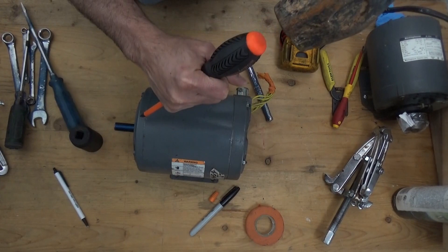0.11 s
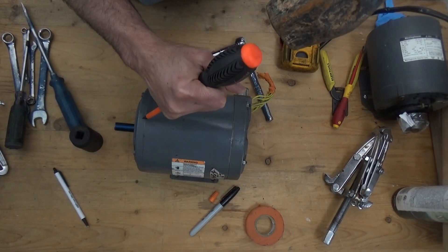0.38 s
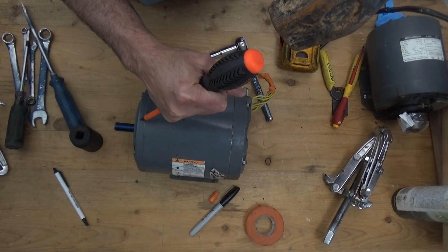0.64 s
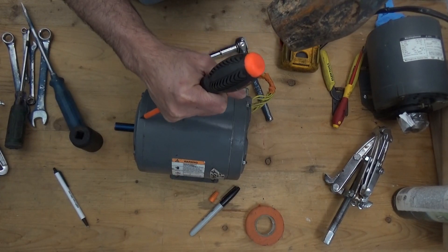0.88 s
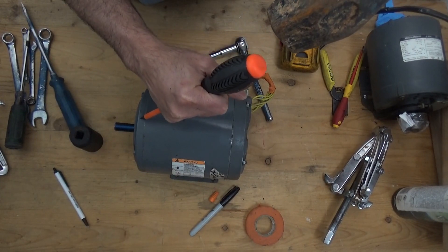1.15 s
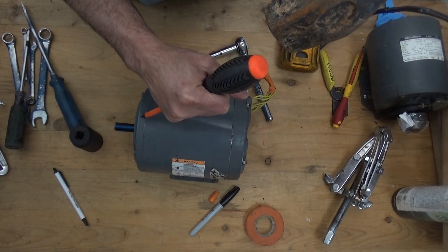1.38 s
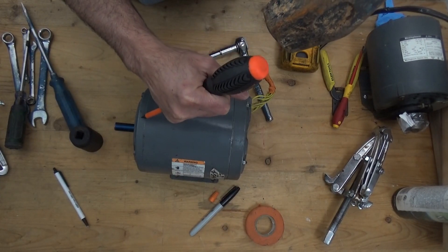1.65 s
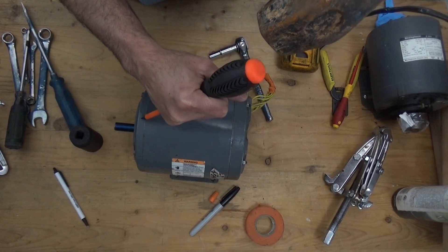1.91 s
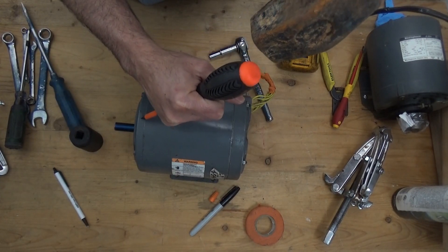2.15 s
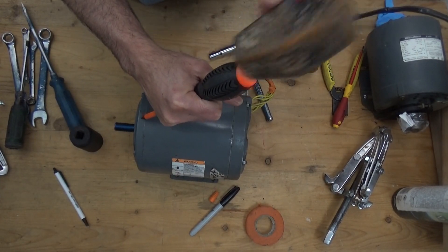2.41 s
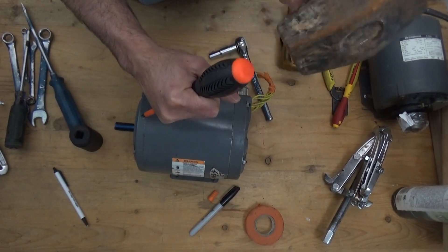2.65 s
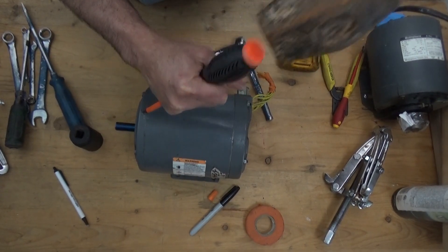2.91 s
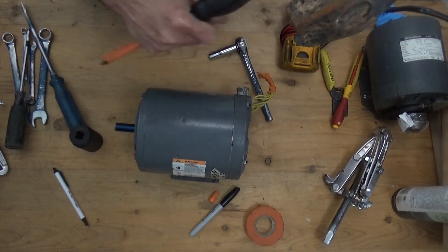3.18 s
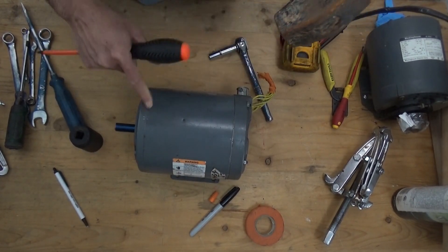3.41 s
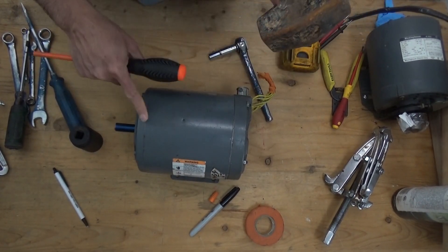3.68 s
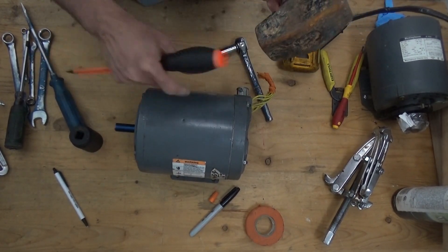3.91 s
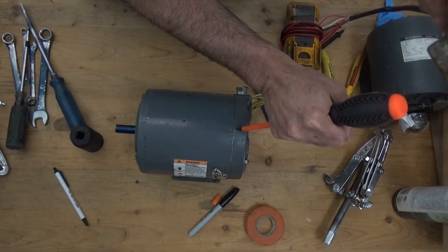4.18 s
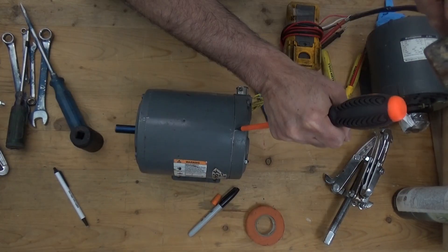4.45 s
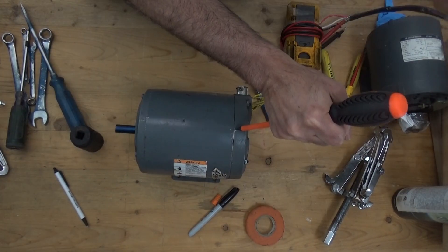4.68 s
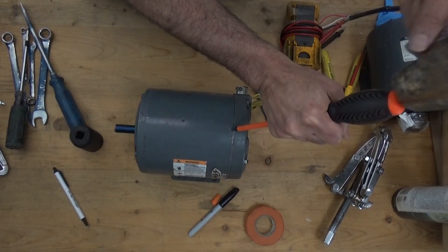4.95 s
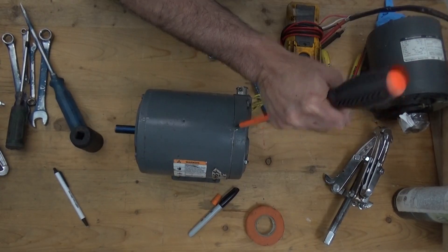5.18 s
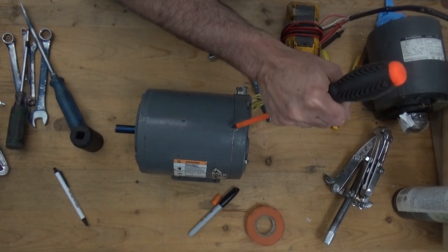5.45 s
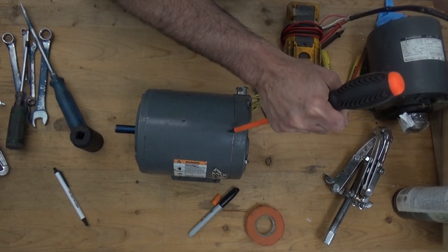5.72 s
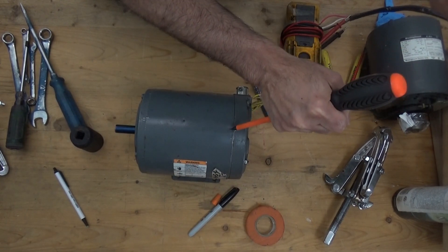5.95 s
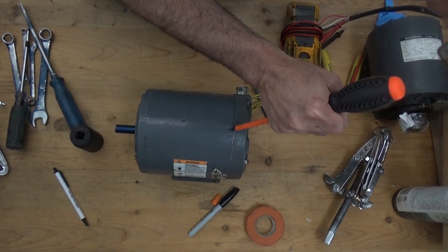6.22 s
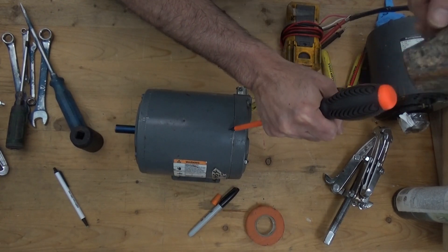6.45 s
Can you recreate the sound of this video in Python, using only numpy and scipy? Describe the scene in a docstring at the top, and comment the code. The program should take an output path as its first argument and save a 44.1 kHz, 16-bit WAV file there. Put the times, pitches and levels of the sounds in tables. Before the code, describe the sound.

A close, nearly centred workshop sound with short room echo, faint hiss, low mains hum and barely audible regular ticking. At 0 s a motor is already jolting under a blow: dull knock, then a stronger clank at 0.1 and smaller bounces until 0.36, with thin spanner ringing. Dry punch-tip ticks come at 0.5, then a cluster with short gritty scrapes at 0.75-0.96 and another at 1.2. Near silence follows. At 2.47 and 2.79 two very loud steel cracks land with wooden boom, dense clang, rattling and uneven rebounds, fading by about 3.2. Soft rocking thumps continue to 3.65, with faint airy finger strokes at 3.6 and 3.75. A small tap sounds at 4.25. At 4.95 one hard, bright double-edged crack clangs with less boom, decaying within half a second. Soft knocks at 5.28 and 5.45, then tiny ticks at 5.8-6.1, and quiet hum to 6.5.

```python
"""Hard steel cracks with a boom and a clang: a sledge hammer drives a punch against the end bell of a
small electric motor on a wooden bench. The motor jumps, lands and rocks; loose spanners ring.
Between blows the punch tip taps and scrapes the housing, and the workshop hums faintly.
Contacts are noise bursts driving resonant modes; the clang and hisses are shaped noise, spanners are
decaying sines, and scattered grains make rattle and friction. Room echoes and a limiter finish it."""
import sys
import numpy as np
from scipy import signal
from scipy.fft import rfft, irfft
from scipy.io import wavfile
from scipy.ndimage import uniform_filter1d

SR = 44100
rng = np.random.default_rng(int(sys.argv[2]) if len(sys.argv) > 2 else 0)


def to_wav(s):
    """Save 16-bit WAV."""
    ch = np.atleast_2d(s).T  # columns
    pcm = np.round(np.clip(ch, -1, 1) * 32767)  # PCM
    wavfile.write(sys.argv[1], SR, pcm.astype(np.int16))


def decibels_to_gain(level_db):
    """Convert a level in decibels to a linear amplitude gain (20 dB per decade)."""
    exponent = np.asarray(level_db, float) / 20
    return 10 ** exponent


N = 290619

# Levels in the tables are relative: each function trims its own layers.
# blows and landings of the motor: t/s, crack/dB, knock/dB, boom/dB, brightness/(dB per octave)
BLOWS = [(0.0014, -27.5, -26.5, -24, -5), (0.0424, -31.5, -27.5, -30.5, -1), (0.1035, -10, -21, -14.5, 3.5),
         (0.1773, -13, -21.5, -21.5, 1), (0.2189, -44, -61, -28.5, -1), (0.2703, -21, -36.5, -29, -3.5),
         (0.299, -24, -73, -65, -4), (0.3557, -35, -74, -74, -11.5), (2.4745, -1.5, -13.5, -9, -1.5),
         (2.513, -18, -28.5, -21, -1), (2.5506, -22, -14.5, -13, -3), (2.575, -23, -51.5, -39, 2.5),
         (2.6043, -33, -28.5, -17, 2.5), (2.647, -38.5, -52, -32.5, -2), (2.7911, -0.5, -10.5, -7.5, -2.5),
         (2.8162, -26.5, -15.5, -20.5, 11), (2.8346, -18, -30.5, -23, 0.6), (2.8894, -22, -15, -14, -0.5),
         (2.9177, -16, -22, -33, 9), (2.9432, -38.5, -31.5, -19.5, -9.5), (2.969, -28, -40, -33, -6),
         (3.0474, -61, -72, -37.5, 3), (3.1708, -45.5, -55, -39, -12), (3.1896, -42.5, -52, -33, 20),
         (4.95, 4, -13, -25, 2), (4.9674, 3, -14, -24, 0)]
# stereo width of the blows: f/Hz, side less mid/dB
BLOW_SIDE = [(60, -15), (110, -19), (200, -24.5), (380, -8), (700, -12), (1290, -4.5), (2380, -12.5),
             (4400, -12.5), (8120, -11), (15000, -22)]
# resonant modes of the wooden bench: f/Hz, level/dB, t60/s
BENCH = [(125, -15, 0.04), (157.5, 0.5, .09), (210, -3, 0.1), (247, 1, 0.077), (276, -1.5, 0.083),
         (338.5, 2, 0.092), (382, -3.5, 0.051)]
# resonant modes of the motor frame: f/Hz, level/dB, t60/s (shortened for rubs)
FRAME = [(459, -1, 0.071), (544.5, -4, 0.11), (612, -0.5, 0.12), (682, -6, 0.13), (736.4, 5, 0.03),
         (787, 5, 0.05), (850, -4, 0.065), (924, 2.5, 0.033), (1048, -2, 0.044), (1126, -14, 0.0071),
         (1286, -2, 0.011), (1397, -13, 0.14), (1694, -10, 0.028), (2143, -12, 0.039)]
# resonant modes of the housing: f/Hz, level/dB, t60/s (shortened for the rattle)
HOUSING = [(1890, 1.5, 0.0073), (2550, -5, 0.021), (3520, 1.5, 0.0031), (3810, 4.5, 0.0084),
           (4280, 1.65, 0.006), (4850, -1, 0.0047), (5880, 3, 0.0038), (7040, -10, 0.0031),
           (7900, -3.5, 0.0048), (8100, -7, 0.0043), (9230, -10, 0.0077), (13000, -23.5, .004)]
# resonant modes of the motor shell: f/Hz, level/dB, t60/s
SHELL = [(2100, -7, .05), (2250, -11, .04), (2549, -5, .06), (2606, -9, .05), (2700, -12, .04)]


def rms_one(x):
    """Scale to unit power."""
    return x / np.sqrt(np.mean(x ** 2) + 1e-30)


def at_hz(points, hz):
    """Read a table on a log-frequency axis."""
    table_hz, values = np.array(points)[:, 0], np.array(points)[:, 1]
    return np.interp(np.log(hz), np.log(table_hz), values)


def filtered(x, order, hz, kind="low"):
    """Butterworth filter with its edge or edges at hz."""
    return signal.sosfilt(signal.butter(order, hz, kind, fs=SR, output="sos"), x)


def shaped(x, points):
    """Give a signal the spectral tilt of a table of f/Hz and dB."""
    hz = np.maximum(np.arange(N // 2 + 1) * SR / N, 1)
    return irfft(rfft(x) * decibels_to_gain(at_hz(points, hz)), N)


def ring(force, hz, t60):
    """A damped resonator: a unit click sets a sine of height 1 ringing."""
    r, w = decibels_to_gain(-60 / (t60 * SR)), 2 * np.pi * hz / SR
    return signal.lfilter([0, np.sin(w)], [1, -2 * r * np.cos(w), r * r], force + 1e-18)


def clicks(seconds, gains):
    """An impulse for each event."""
    out = np.zeros(N)
    np.add.at(out, (np.clip(seconds, 0, 6.5) * SR).astype(int), gains)
    return out


def swell(x, rise_s, fall_s):
    """Each impulse rises and dies away; area one."""
    a, b = np.exp(-1 / (max(rise_s, 1e-5) * SR)), np.exp(-1 / (max(fall_s, 1e-5) * SR))
    risen = signal.lfilter([1 - a], [1, -a], x + 1e-30)
    return signal.lfilter([1 - b], [1, -b], risen)


def gestures(table, column, rise_db_per_s, fall_db_per_s):
    """Each row (start, hold, ..) rises to its level, holds it and falls, at steady dB per second."""
    rows, t = np.array(table)[:, :, None], np.arange(N) / SR
    early = np.maximum(rows[:, 0] - t, 0)
    late = np.maximum(t - rows[:, 0] - np.abs(rows[:, 1]), 0)
    below_db = np.minimum(rise_db_per_s * early + fall_db_per_s * late, 200)
    return decibels_to_gain(rows[:, column] - below_db).sum(0)


def bands(low_hz):
    """Half-octave band-passes with their centres."""
    edges = low_hz * 2 ** np.arange(0, np.log2(17000 / low_hz), .5)
    return [(np.sqrt(a * b), signal.butter(2, [a, b], "band", fs=SR, output="sos"))
            for a, b in zip(edges, edges[1:])]


def strike(table, column, modes, rise_s, hold_s, fall_s, spread_db, trim_db, bright=None):
    """A rough, chattering contact drives every mode while it lasts, with new strengths per event; stereo."""
    rows, out, hold = np.array(table), 0, max(int(hold_s * SR), 1)
    luck = rng.normal(0, 1, (len(rows), len(modes)))
    chatter = rng.standard_normal((2, 2, N))   # two mid/side pairs, taken in turn by the modes
    for k, (hz, level_db, t60) in enumerate(modes):
        tilt_db = rows[:, bright] * np.log2(hz / 4000) if bright else 0
        event_db = rows[:, column] + level_db + tilt_db + trim_db + spread_db * luck[:, k]
        power = clicks(rows[:, 0], decibels_to_gain(event_db) ** 2)
        power = np.abs(uniform_filter1d(power, hold, origin=(hold - 1) // 2, mode="constant"))
        force = np.sqrt(swell(power, rise_s, fall_s)) * chatter[k % 2]
        mid, side = ring(force, hz, t60)
        out = out + mid + decibels_to_gain(at_hz(BLOW_SIDE, hz)) * side * [[1], [-1]]
    return out


def chime(start_s, level_db, modes, rise_s, lasts_s, tilt_db):
    """Clean modes swell and decay, and are damped faster once lasts_s has passed."""
    t = np.arange(SR // 2) / SR
    shape = (1 - np.exp(-t / rise_s)) * np.exp(-np.maximum(t - lasts_s, 0) / 0.026)
    tone = 0
    for hz, db, t60 in modes:
        mode_db = level_db + db + tilt_db * np.log2(hz / 7000) - 60 * t / t60
        tone = tone + decibels_to_gain(mode_db) * np.sin(2 * np.pi * (hz * t + rng.random()))
    out, at = np.zeros(N + len(t)), int(max(start_s, 0) * SR)
    out[at:at + len(t)] = shape * tone
    return out[:N]


def workshop():
    """Air and microphone hiss, mains hum, a thin whine, a faint regular ticking, and the shaking stand."""
    # air spectrum: f/Hz, level/dB
    air_points = [(15, -39), (25, -13.5), (64, -0.5), (87, -18.5), (108, -3.5), (145, -7.5), (242, -5),
                  (451, -11.5), (503, -12), (1370, -14), (1700, -16.5), (2610, -18), (16000, -27)]
    # stereo width of the air: f/Hz, side less mid/dB
    air_side = [(60, -25), (110, -17), (200, -8), (380, -4), (700, -1), (1290, 1), (2380, -2), (4400, -6),
                (8120, -8.5), (15000, -10)]
    # hum and whine: f/Hz, rms level/dB
    hum_lines = [(59.8, -74), (120, -75.5), (7900, -82)]
    # the microphone stand is set shaking with the bench: t/s, hold/s, level/dB
    shakes = [(0.0, .25, -66), (0.84, .04, -53), (2.478, .1, -45), (2.796, .14, -46), (3.2, .03, -57),
              (4.955, .03, -56)]
    t = np.arange(N) / SR
    mid = shaped(rng.standard_normal(N), air_points)
    side = shaped(shaped(rng.standard_normal(N), air_points), air_side)
    air = decibels_to_gain(-63) * (mid + side * [[1], [-1]]) / np.std(mid)
    hum = 0
    for hz, db in hum_lines:
        drift = 0.05 * np.cumsum(rng.standard_normal(N)) * np.sqrt(hz / 60 / SR)   # wandering phase, in cycles
        hum = hum + np.sqrt(2) * decibels_to_gain(db) * np.sin(2 * np.pi * (hz * t + drift))
    when = np.arange(.012, 6.5, 1 / 29.97)   # ticks per second
    tick_gains = decibels_to_gain(-58.5 + 3.7 * rng.standard_normal(len(when)))
    tick = ring(clicks(when, tick_gains), hz=3200, t60=0.0073)
    sway = decibels_to_gain(-76) + gestures(shakes, 2, rise_db_per_s=901, fall_db_per_s=45)   # never quite at rest
    rumble = rms_one(filtered(rng.standard_normal(N), 2, [22, 60], "band"))
    rows = np.array(shakes)
    jerk = swell(clicks(rows[:, 0], decibels_to_gain(rows[:, 2] + 29.5)), .002, 0.0059)   # starts each shake
    return air + hum + tick + ring(jerk, 60, .045) + sway * rumble


def stroke():
    """A fingertip on paint: smooth airy hiss of soft skin and a little shell ring."""
    # strokes over the housing: t/s, hold/s, level/dB
    stroke_times = [(3.594, .036, -60), (3.742, 0.067, -59.5)]
    # hiss of the skin: f/Hz, level/dB
    skin = [(1180, -45), (2000, -26), (2510, 7.5), (2770, -8), (3340, -2), (4300, -8), (5100, 1.5),
            (7010, -5.5), (9780, -1), (14000, -26)]
    force = gestures(stroke_times, 2, rise_db_per_s=330, fall_db_per_s=520)
    shell = sum(decibels_to_gain(db - 46) * ring(force * rng.standard_normal(N), hz, t60) for hz, db, t60 in SHELL[2:])
    return force * rms_one(shaped(rng.standard_normal(N), skin)) + shell


def rubs():
    """Dense uneven grains of friction: bright hiss, a share ringing in the shell, a dull part in the frame."""
    # the tip sliding over the paint: t/s, hold/s, level/dB, body level/dB
    slides = [(0.792, 0.0054, -42, -85), (0.896, 0.011, -45, -44), (0.96, 0.0065, -56.5, -79),
              (1.202, 0.035, -53.5, -57.5), (1.442, .005, -61, -75), (4.442, 0.042, -70, -64)]
    # hiss of the slide: f/Hz, level/dB
    slide_hiss = [(880, -37), (1500, -5), (2230, -9), (2600, 4), (3120, -12), (3370, -2), (5400, -10.5),
                  (8250, -12.5), (15000, -33.5)]
    present = rng.random(N) < 6000 / SR   # grains per second
    grains = rms_one(rng.standard_normal(N) * decibels_to_gain(2.5 * rng.exponential(1, N)) * present)
    bright = gestures(slides, column=2, rise_db_per_s=501, fall_db_per_s=469)
    dull = gestures(slides, column=3, rise_db_per_s=501, fall_db_per_s=170)
    hiss = rms_one(shaped(grains, slide_hiss))
    shell = sum(decibels_to_gain(db - 29) * ring(bright * grains, hz, t60) for hz, db, t60 in SHELL)
    frame = sum(decibels_to_gain(db - 31) * ring(dull * grains, hz, 0.083 * t60) for hz, db, t60 in FRAME)
    return bright * hiss + shell + frame


def taps():
    """The tip ticks dryly in the housing, knocks the frame and rings the end bell or the shell."""
    # punch tip touches: t/s, tick/dB, bell ring/dB, shell ring/dB, brightness/(dB per octave)
    touches = [(0.4895, -37, -53, -43, -4), (0.5367, -30, -50, -42, 0.5), (0.757, -46, -56, -57, 0.2),
               (0.7753, -33.5, -50, -40, 1), (0.8001, -27.5, -54, -43, 10), (0.8739, -33, -70, -63, 5),
               (0.8924, -27, -48, -60, 0.5), (0.9586, -39, -61, -50, 2), (1.1993, -39, -57, -44, 9),
               (3.7365, -45, -71.5, -69, -3), (4.1858, -45, -54, -74.5, -5),
               (4.2445, -28.5, -44, -44, -8.5), (5.8226, -46.5, -64, -72.5, 7),
               (5.8909, -43.5, -66, -63, 0.6), (6.0187, -28, -47, -56, -7), (6.126, -46.5, -82, -78, 9)]
    # modes of the end bell: f/Hz, level/dB, t60/s
    end_bell = [(554, 0, 0.137), (1003, 10, 0.04), (1335, -2, 0.27)]
    tick = strike(touches, 1, HOUSING, .0001, .001, .0008, spread_db=2.5, trim_db=-11, bright=4)
    after = strike(touches, 1, HOUSING, .001, .004, .014, spread_db=2.5, trim_db=-17, bright=4)
    knock = strike(touches, 2, FRAME[::2], 0.0014, 0.019, 0.02, spread_db=9, trim_db=-16)
    rings = 0
    for s, _, bell_db, shell_db, _ in touches:
        rings = rings + chime(s, bell_db - 4, end_bell, rise_s=0.0054, lasts_s=0.126, tilt_db=0)
        rings = rings + chime(s, shell_db + 3, SHELL, rise_s=0.00061, lasts_s=.035, tilt_db=0)
    return filtered(tick, 2, 11000) + filtered(after + knock, 2, 5000) + rings


def spanners():
    """Solid steel, jolted on the bench, rings on clean lines."""
    # jolts: t/s, long spanner/dB, short spanner/dB, brightness/(dB per octave), undamped for/s
    jolts = [(0.0, -44.5, -51, -7, 0.047), (0.104, -40, -33, -1.5, 0.043), (0.177, -57, -39, -10, 0.077),
             (0.299, -67, -60, -13, 0.085), (2.49, -57.5, -38, -12, 0.11), (2.56, -56, -45, -7.5, 0.034),
             (2.612, -57.5, -60, -4.5, 0.023), (2.652, -63.5, -54.5, -4.5, 0.02),
             (2.809, -59, -61.5, 0.5, .08), (2.918, -62, -46, -15, 0.05), (3.008, -77, -65, -5, 0.42)]
    # modes of the long spanner: f/Hz, level/dB, t60/s
    long_spanner = [(2783, -4, .35), (7060, -1, .6), (8800, -15, .3), (11600, -19, .3), (12560, -5, .4)]
    # modes of the short spanner: f/Hz, level/dB, t60/s
    short_spanner = [(7330, 0, .5), (10470, -11, .35), (10510, -13, .35), (14015, -24, .35),
                     (15600, -28, .06)]
    out = 0
    for s, long_db, short_db, tilt, lasts in jolts:
        out = out + chime(s, long_db, long_spanner, 0.00067, lasts, tilt)
        out = out + chime(s, short_db, short_spanner, .006, lasts, tilt)
    return out


def rattle():
    """Dense uneven little knocks ring the loose parts and the middle modes of the housing."""
    # chatter after blows: t of nearest blow/s, hold/s, knocks/dB, fall/(dB per s), ringing/dB
    chatters = [(0.0014, .095, -49, 391, -48), (0.1036, .004, -44, 356, -30),
                (0.1773, .004, -29.5, 451, -45), (2.4736, .02, -47.5, 170.5, -51),
                (2.575, .003, -48.5, 284, -55.5), (2.647, .003, -57, 483, -58),
                (2.7912, .014, -35, 215, -50), (2.9191, .003, -37, 502.5, -37.5),
                (4.95, .015, -21.5, 219.5, -38.5)]
    # modes of the loose parts: f/Hz, level/dB, t60/s
    loose_parts = [(4500, 0.5, .04), (4840, -9, .04), (5300, -2.5, 0.06), (6160, -1.5, 0.045),
                   (5990, -3, 0.023)]
    present = rng.random(N) < 2500 / SR   # grains per second
    grains = rng.standard_normal(N) * decibels_to_gain(2 * np.minimum(rng.exponential(1, N), 3)) * present
    housing = sum(decibels_to_gain(db) * ring(grains, hz, 0.6 * t60) for hz, db, t60 in HOUSING[4:7])
    housing = filtered(housing, 2, [3500, 7000], "band")
    parts = sum(decibels_to_gain(db) * ring(grains, hz, t60) for hz, db, t60 in loose_parts)
    rows, blow_s = np.array(chatters), np.array(BLOWS)[:, 0]
    nearest = np.abs(rows[:, :1] - blow_s).argmin(axis=1)
    rows[:, 0] = blow_s[nearest] + .003   # each follows its blow by 3 ms
    knocks, ringing = (gestures(rows, column, 8000, rows[:, 3:4]) for column in (2, 4))
    return knocks * rms_one(housing) + ringing * rms_one(parts)


def rocking():
    """Soft feet meet the plank for some hundredths of a second: a compact knock in bench and low frame."""
    # the motor rocking back onto its feet: t/s, level/dB
    rocks = [(3.15, -42), (3.221, -45), (3.374, -37.5), (3.539, -55), (3.652, -55.5), (5.283, -37),
             (5.452, -45)]
    knock = strike(rocks, 1, BENCH + FRAME[:2], 0.00067, 0.0035, 0.014, spread_db=1.5, trim_db=-3)
    return filtered(knock, 2, [110, 450], "band")


def clang():
    """Countless modes of casing, rotor and tools: noise that dies band by band."""
    # dense ringing of steel after a blow: f/Hz, level/dB
    clang_points = [(530, -33), (900, -0.5), (1260, -10.5), (1570, -9), (1950, -13), (3640, -18.5),
                    (6640, -22), (8870, -26), (16000, -50)]
    # its decay: f/Hz, t60/s
    clang_t60 = [(1000, 0.43), (2000, 0.39), (4000, 0.27), (8000, 0.25), (15000, .2)]
    rows, out, white = np.array(BLOWS), 0, rng.standard_normal((2, 2, N))
    for k, (hz, sos) in enumerate(bands(low_hz=908)):
        # brightness tilts each clang about 3 kHz
        tilt_db = np.clip(rows[:, 4], -8, 8) * np.log2(hz / 3000)
        # the clang grows faster than the crack that starts it: 1.3 dB per dB
        hits = clicks(rows[:, 0], decibels_to_gain(27 + 1.3 * rows[:, 1] + tilt_db) ** 2)
        fall_s = at_hz(clang_t60, hz) / (2 * np.log(1000))
        mid, side = signal.sosfilt(sos, white[k % 2])
        wide = mid + decibels_to_gain(at_hz(BLOW_SIDE, hz)) * side * [[1], [-1]]
        # each blow is a fixed energy spread over the decay
        out = out + decibels_to_gain(at_hz(clang_points, hz)) * np.sqrt(swell(hits, 0.0066, fall_s)) * wide
    return filtered(out, 3, 11000)   # the microphone rolls off above 11 kHz


def blows():
    """Sharp crack in the housing and a low push; frame and bench take up the force more slowly and chatter."""
    crack = strike(BLOWS, 1, HOUSING, .0001, .002, .0012, spread_db=1.5, trim_db=-11, bright=4)
    knock = strike(BLOWS, 2, FRAME, 0.0018, .03, 0.0072, spread_db=2.2, trim_db=-2.96)
    first_touch = strike(BLOWS, 2, FRAME, 0.00018, 0.0088, 0.0017, spread_db=2.2, trim_db=-7.5)
    boom = strike(BLOWS, 3, BENCH, .002, 0.016, .012, spread_db=3.5, trim_db=-3)
    rows = np.array(BLOWS)
    shove = swell(clicks(rows[:, 0] + 0.004, decibels_to_gain(rows[:, 3] + 8)), 0.00073, 0.0025)
    push = filtered(ring(shove, 155, .1), 3, 95, "high")
    body = filtered(knock + first_touch + boom, 3, [118, 3000], "band")   # a heavy contact has no treble
    return filtered(crack, 3, 10500) + body + push


def room(x):
    """Diffuse echoes, other ones on each side, each band dying at its own rate, quickest at the top."""
    # reverberation: f/Hz, t60/s
    room_t60 = [(100, 0.37), (400, 0.43), (1500, 0.46), (5000, 0.42), (14000, 0.21)]
    t, white, tail = np.arange(SR) / SR, rng.standard_normal((2, SR)), 0
    for hz, sos in bands(low_hz=60.3):
        tail = tail + signal.sosfilt(sos, white) * decibels_to_gain(-60 * t / at_hz(room_t60, hz))
    tail = tail * (1 - np.exp(-t / 0.018))   # reflections build up
    tail = tail / np.sqrt(np.sum(tail ** 2, 1, keepdims=True))
    return signal.fftconvolve(x[None], tail, axes=1)[:, :N]


def scene():
    """Everything on the bench sits near the middle; the room widens it."""
    background = workshop()
    bench = stroke() + rubs() + taps() + spanners() + rattle() + rocking() + blows()
    steel = clang()
    sent = (bench + decibels_to_gain(-4) * steel).mean(0)
    echoes = room(filtered(sent, 1, 2500))   # walls and shelves soak up treble
    mid, side = echoes.mean(0), (echoes[0] - echoes[1]) / 2
    reverb = decibels_to_gain(-12) * mid + decibels_to_gain(-17) * side * [[1], [-1]]
    return bench * decibels_to_gain([[.2], [-.2]]) + steel + reverb + background


def low_pass(x):
    """Removes everything above the highest recorded frequency."""
    return signal.sosfilt(signal.butter(12, 16570, fs=SR, output="sos"), x)


def record(dry):
    """A limiter holds the blows down and recovers; peaks are rounded and the top treble is cut."""
    t = np.arange(N) / SR
    level_db = 20 * np.log10(np.abs(dry).max(0) + 1e-9)
    release_db_per_s, ceiling_db = 150, -4.5
    held_db = np.maximum.accumulate(level_db + release_db_per_s * t) - release_db_per_s * t
    gain = decibels_to_gain(-swell(np.maximum(held_db - ceiling_db, 0), 0.00049, 0.0013))
    rounded = 0.91 * np.tanh(dry * gain / 0.93)
    mix = filtered(rounded, 12, 15600)
    return low_pass(mix)


dry = scene()
out = record(dry)
to_wav(out)
```